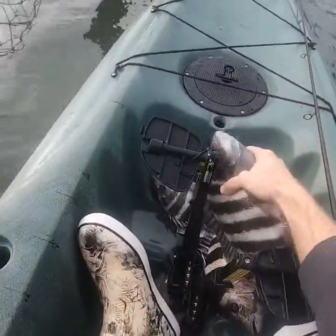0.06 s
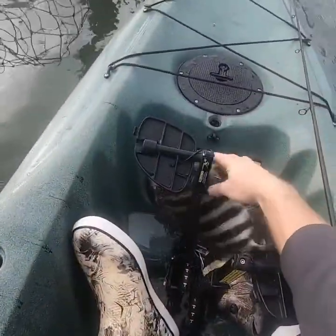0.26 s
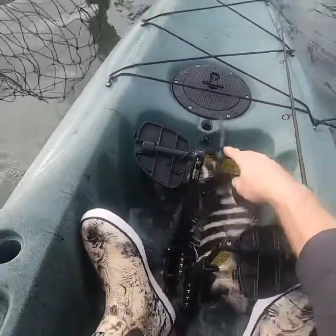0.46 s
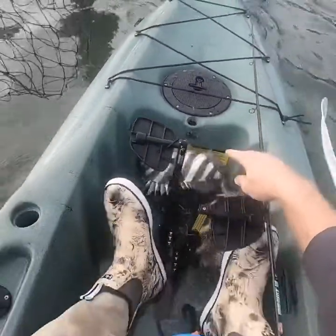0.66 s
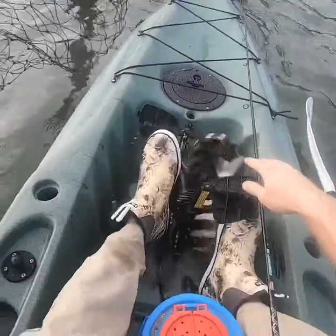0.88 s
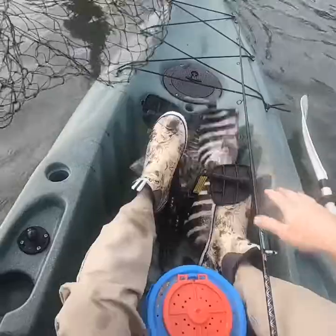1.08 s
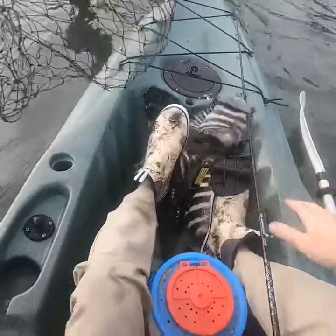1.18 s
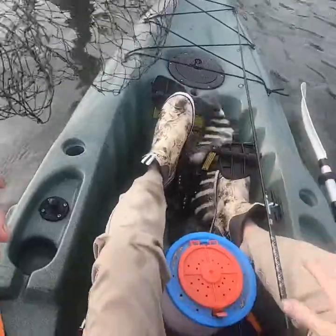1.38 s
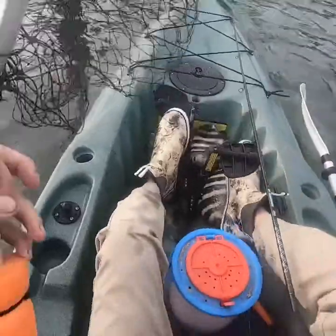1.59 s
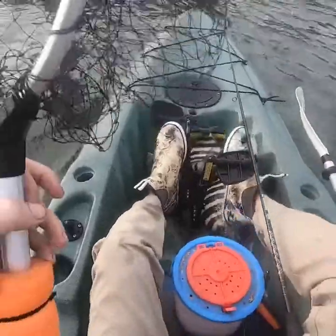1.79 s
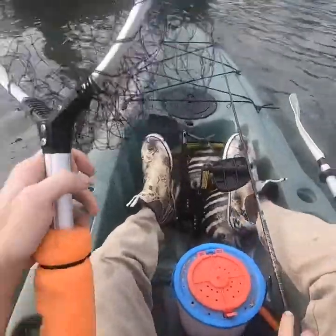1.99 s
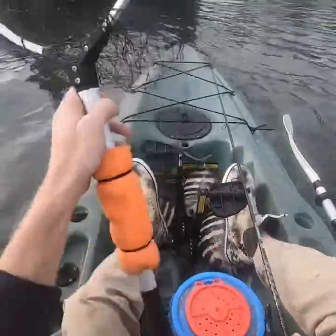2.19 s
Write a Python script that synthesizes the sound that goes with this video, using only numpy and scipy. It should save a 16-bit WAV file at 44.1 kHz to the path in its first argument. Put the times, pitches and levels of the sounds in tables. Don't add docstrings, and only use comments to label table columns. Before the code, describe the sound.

A wet fish struggles on a hollow plastic kayak deck. After a faint start, loud boxy thumps and wet slaps cluster from 0.25 to 0.6 seconds, with chain and net rattles, clicks and scraping. Scuffing continues to another burst of knocks around 0.9-1.0, then separate thuds near 1.37 and 1.57. Afterwards only faint taps remain under low wind rumble, close and almost mono.

```python
import sys
import numpy as np
from scipy import signal
from scipy.fft import rfft, irfft, next_fast_len
from scipy.io import wavfile
from scipy.ndimage import uniform_filter1d

SR = 44100
rng = np.random.default_rng(int(sys.argv[2]) if len(sys.argv) > 2 else 0)


def dump_mix(stems):
    frames = np.atleast_2d(stems).T
    limited = np.clip(frames, -1, 1)
    pcm = np.round(limited * 32767).astype(np.int16)
    wavfile.write(sys.argv[1], SR, pcm)


def magnitude_from_level(level_db):
    exponent = np.asarray(level_db, float) / 20
    return 10 ** exponent


N = 99225

# freq_hz, level_db_per_hz
SCRAPE_SPECTRUM = [(180, -2), (300, 2), (371, -6.5), (541, -9.5), (1370, -12), (3170, -18), (9800, -35.5),
                   (15000, -38)]


def unit(x):
    return x / np.sqrt(np.mean(x ** 2))


def colour(x, points):
    n, p = next_fast_len(2 * len(x)), np.array(points)
    log_hz = np.log(np.maximum(np.arange(n // 2 + 1) * SR / n, 1))
    gain_db = np.interp(log_hz, np.log(p[:, 0]), p[:, 1], left=-80)
    return irfft(rfft(x, n) * magnitude_from_level(gain_db), n)[:len(x)]


def band(x, hz, width_hz):
    q = max(hz / width_hz, 0.3)
    return signal.lfilter(*signal.iirpeak(min(hz, 0.4 * SR), q, fs=SR), x)


def walk(rate_hz):
    k = int(SR / rate_hz)
    steps = np.repeat(rng.standard_normal(N // k + 1), k)
    return 1.11 * uniform_filter1d(uniform_filter1d(steps, k), k)[:N]


def add(out, x, start_s):
    i = int(start_s * SR)
    out[i:i + len(x)] += x[:max(len(out) - i, 0)]


def curve(table):
    p = np.array(table)
    return np.interp(np.arange(N) / SR, p[:, 0], p[:, 1])


def swell(t, length_s):
    rise_s = 0.47 * length_s
    rise = np.sin(np.pi / 2 * np.minimum(t / rise_s, 1)) ** 2
    return rise * np.exp(-(np.maximum(t - rise_s, 0) / length_s) ** 2)


def hull(x):
    # freq_hz, level_db, t60_s
    modes = [(96.4, 1, 0.21), (140, 0.5, 0.32), (174.8, 6, 0.12), (228.7, 5, 0.12), (300, -15, 0.48),
             (385.3, -6.5, 0.25)]
    t = np.arange(SR // 3) / SR
    ring = np.zeros(len(t))
    for hz, db, t60_s in modes:
        ring += magnitude_from_level(db) * np.sin(2 * np.pi * hz * t) * np.exp(-np.log(1000) * t / t60_s)
    return signal.fftconvolve(x, ring)[:N] / 100


def thumps():
    # start_s, peak_db, contact_pitch_hz,
    # contact_cycles
    blows = [(0.051, -30, 168, 5.8), (0.211, -24.5, 196.6, 6.3), (0.278, 0.5, 254.3, 4.14),
             (0.295, -12.5, 192, 2.26), (0.307, -16, 207, 3.3), (0.348, -10, 227, 4.5),
             (0.413, -12, 154, 1.8), (0.427, -2.5, 359, 3.06), (.428, -10, 700, 3.33),
             (.432, -8, 142.6, 1.93), (0.524, -5.5, 172, 2.9), (.542, 0, 239, 2.66),
             (0.563, -10.5, 147, 2.86), (0.718, -20, 149, 4.5), (.783, -11, 300, 4.06),
             (0.832, -13.5, 170, 2.47), (0.8893, -1.5, 234.6, 3.27), (0.907, -9, 302, 3.12),
             (0.966, -1.5, 243, 1.96), (0.975, -15, 140, 4.55), (0.981, -15, 251, 3.23),
             (1.12, -23, 76.6, 1.16), (1.228, -21, 326, 5.8), (1.250, -18.5, 235, 7), (1.367, 0, 255, 2.5),
             (1.38, -13, 217, 2.75), (1.418, -16.5, 708, 3.5), (1.46, -11.5, 217, 2.06),
             (1.567, -5.5, 243.6, 1.95), (1.58, -21.5, 223, 2.73), (1.477, -31, 214, 4.9),
             (1.971, -20, 108, 1.66), (2.174, -26, 184, 3.95)]
    ring_db, overtone_db = -16.5, -10.5
    slap_db, slap_hz, slap_s = -25, 480, 0.0083
    flex, slap, t = np.zeros(N), np.zeros(N), np.arange(2000) / SR
    slap_env = t / slap_s * np.exp(-(t / slap_s) ** 2)
    for s, db, hz, cycles in blows:
        contact_s = cycles / hz
        u = np.arange(int(contact_s * SR)) / (contact_s * SR)
        press = np.sin(np.pi * u ** 0.98) ** 1.21
        bend = np.cos(2 * np.pi * cycles * (u - 0.47))
        overtone = magnitude_from_level(overtone_db) * (1 - u) ** 2 * np.sin(2 * np.pi * 1.88 * cycles * u)
        add(flex, magnitude_from_level(db) * press * (bend - overtone), s)
        add(slap, magnitude_from_level(db) * slap_env * rng.standard_normal(len(t)), s)
    slap = band(band(slap, slap_hz, 650), slap_hz, 620) * 10
    return flex + magnitude_from_level(ring_db) * hull(flex) + magnitude_from_level(slap_db) * slap


def rattles():
    # start_s, peak_db, brightness_db, length_ms
    bursts = [(0.0484, -28.5, -64, 3.6), (0.121, -41, -11, 5), (0.173, -30.5, -42, 8.7),
              (0.2217, -24, -20.5, 13), (0.2342, -8, -20.5, 5.5), (0.2506, -17.5, -14, 12),
              (0.2665, -19.5, -19, 19), (0.2894, -14, -14.5, 3.4), (0.3273, -14, -41, 4.2),
              (0.383, -29.5, -3.5, 5.2), (0.4074, -22, -7.5, 4.1), (0.426, -18, -37, 4),
              (0.4573, -13, -13, 12), (0.472, -21, -5, 8.5), (0.4943, -20.5, -5.5, 8.5),
              (0.5102, -23, -7.5, 9.5), (0.5427, -20.5, -8, 3.2), (0.5637, -23.5, -8, 3.8),
              (0.6055, -25, -7.5, 15), (0.6241, -18, -11.5, 15.3), (0.6427, -11, -23, 11.7),
              (0.666, -23, -12, 7.4), (0.751, -32, -18, 2.8), (0.7861, -13, -40, 6.2),
              (0.832, -30.5, -5, 17), (0.8636, -18, -11.5, 3.2), (0.8871, -16, -14, 5.1),
              (0.9354, -22.5, -20.5, 4.2), (0.9487, -23.5, -11, 3.7), (.980, -24.5, -29, 5.7),
            (1.032, -41, -6.5, 8.9), (1.114, -31, -21.5, 6), (1.0883, -27, -35, 12),
            (1.1546, -33.5, -8.5, 10), (1.1876, -26.5, -12, 4.5), (1.197, -28, -12.5, 3.4),
            (1.2073, -21.5, -17, 6.5), (1.236, -26.5, -16, 4), (1.249, -31, -7.5, 6),
            (1.2906, -30, -12, 1.5), (1.279, -35, -10, 3), (1.3056, -32, -29, 4.4),
            (1.3137, -24.5, -15.5, 9), (1.347, -28, -11.5, 3.4), (1.358, -24, -38, 9),
            (1.396, -32.5, -9, 4.5), (1.4112, -22.5, -25, 7.7), (1.4385, -29, -14.5, 4),
            (1.4745, -36, -38, 4.1), (1.5268, -30, -23, 9.9), (1.5603, -32.5, -14, 2.6),
            (1.5782, -31, -12.5, 6.1), (1.6054, -28.5, -28.5, 6.9), (1.7369, -34, -40, 5.4),
            (1.814, -36.5, -19, 4), (1.859, -50, -9.5, 1.6), (1.868, -43, -21, 4), (2.056, -32.5, -24, 2.3),
            (2, -18, -82, 4.8), (2.029, -31.5, -37, 8.3), (2.1704, -40, -32, 6.8), (2.205, -33, -20.5, 3.9),
            (2.2418, -45.5, -44, 1.9)]
    body_db, top_lift_db, grit_db, patchy_db, split_hz = -10.5, 2, -2.5, -2, 7100
    out, t = np.zeros(N), np.arange(3000) / SR
    centres_hz = 650 * 2 ** np.arange(0, 4.6, 0.6)
    for s, db, bright_db, ms in bursts:
        noise, wander = rng.standard_normal((2, len(t)))
        rough = magnitude_from_level(grit_db * 2.3 * uniform_filter1d(wander, size=25))
        grit = unit(colour(noise * rough, SCRAPE_SPECTRUM))
        for hz in centres_hz:
            strength, spread = rng.standard_normal(2)
            octaves = np.clip(np.log2(hz / split_hz) + 1, 0, 1.5)
            lift_db = (bright_db + 19.5 + top_lift_db) * octaves
            level_db = db + body_db + lift_db + patchy_db * np.tanh(strength)
            env = swell(t, (ms + 1) / 1000 * magnitude_from_level(1.2 * spread))
            burst = magnitude_from_level(level_db) * env * band(grit, hz, hz * 0.61)
            add(out, burst, s - 0.001 + 0.0004 * abs(spread))
    return out


def pings():
    # start_s, peak_db, ring_hz, length_ms
    clicks = [(0.085, -36.5, 543, 4), (0.194, -35.5, 674, 8), (.236, -25, 1630, 3.1),
              (0.237, -24.5, 980, 4.7), (0.266, -26.5, 3900, 6.2), (0.289, -19, 3070, 4.4),
              (0.332, -20.5, 1036, 14), (.354, -20.5, 920, 5.7), (0.408, -32, 4060, 5.2),
              (0.473, -21.5, 3100, 4.3), (0.475, -26.5, 1734, 6.4), (.543, -12, 543, 5.6),
              (0.565, -29.5, 3880, 5), (.607, -29, 3480, 5), (.625, -28, 1680, 6.4),
              (.645, -16.5, 798, 6.6), (0.647, -26, 3130, 4.4), (.664, -31, 2370, 9),
              (0.71, -24.5, 1150, 7.4), (0.725, -36.5, 3100, 7.7), (0.811, -26.5, 1660, 7.3),
              (.845, -35, 3800, 3.8), (.886, -34, 4370, 7.5), (0.936, -29.5, 3100, 3),
              (.937, -30.5, 2020, 2.9), (.957, -34.5, 3110, 4), (1.032, -40, 2030, 8.2),
              (1.033, -41, 3020, 4.4), (1.061, -39.5, 2980, 4.2), (1.087, -32, 866, 9.5),
              (1.089, -32, 1650, 4.2), (1.128, -41.5, 3760, 6), (1.156, -31.5, 2960, 7.4),
              (1.186, -34.5, 3000, 12), (1.21, -28.5, 1680, 3.7), (1.265, -31, 3260, 4.8),
              (1.313, -39, 3740, 5.3), (1.344, -31, 1193, 20), (1.364, -33, 3540, 7.2),
              (1.380, -39, 2090, 4.9), (1.432, -24, 520, 4.5), (1.576, -29.5, 1020, 2.8),
              (1.608, -51, 2130, 3.5), (1.813, -41, 3160, 3.4), (2.087, -48, 1870, 5.6),
              (2.172, -36.5, 1590, 4.7), (2.237, -39.5, 1636, 11.5)]
    out, t = np.zeros(N), np.arange(2000) / SR
    for s, db, hz, ms in clicks:
        wobble = np.convolve(rng.standard_normal(len(t)), np.hanning(60), "same")
        rough = 1 + 0.8 * unit(wobble)
        env = swell(t, 1.46 * ms / 1000 / 2)
        add(out, magnitude_from_level(db) * env * rough * np.sin(2 * np.pi * hz * t), s - 0.001)
    return out


def crackle():
    rate_per_s, snap_s, spread_db = 110, 0.0054, 2.5
    hits = rng.random(N) < rate_per_s / SR
    sizes = magnitude_from_level(spread_db * np.minimum(rng.exponential(size=N), 2))
    return signal.fftconvolve(hits * sizes, np.hanning(int(snap_s * SR)), "same")


def scuffing():
    # time_s, scuffing_level_db
    struggle = [(0, -48.5), (.21, -48.5), (.24, -37), (.47, -30.5), (.7, -33), (.96, -29.5), (.99, -43),
                (1.14, -47), (1.2, -37.5), (1.45, -41.5), (1.5, -45.5), (1.64, -51), (2.08, -52),
                (2.25, -44.5)]
    flicker_db, dulling = 2.5, 0.044
    effort_db = curve(struggle)
    lively = np.clip((effort_db + 58) / 20, 0.15, 1)
    hiss = colour(rng.standard_normal(N), SCRAPE_SPECTRUM)
    shared = crackle()
    scrape = np.zeros(N)
    for hz in 400 * 2 ** np.arange(0, 5.3, 0.5):
        grains = hiss * (1 + 0.8 * lively * (0.5 * shared + 0.56 * crackle()))
        grains = band(band(grains, hz, hz * 0.78), hz, hz * 0.78)
        off_centre = abs(np.log2(hz / 2000)) + 3 * max(np.log2(hz / 8000), 0)
        flicker = flicker_db * walk(90.15) * lively
        scrape += grains * magnitude_from_level(flicker + dulling * (effort_db + 33.5) * off_centre)
    scrape /= np.sqrt(np.median(uniform_filter1d(scrape ** 2, size=4000)))
    rumble = unit(hull(rng.standard_normal(N) * magnitude_from_level(5.0 * walk(35.53))))
    rumble_db = 6.0 + 0.063 * (effort_db + 30.5)
    return magnitude_from_level(effort_db) * (scrape + magnitude_from_level(rumble_db) * rumble)


def breeze():
    # freq_hz, level_db_per_hz
    air_spectrum = [(15, -40), (25, 2.5), (208, -10), (366, -3), (480, -11), (3280, -41.5), (9000, -88),
                    (11700, -104), (19800, -120)]
    # time_s, level_db
    gust_level = [(0, -51), (.25, -26.5), (.45, -30.5), (.75, -24), (1.05, -35.5), (1.35, -35.5),
                  (1.75, -34.5), (2.25, -35.5)]
    # time_s, level_db
    apart_level = [(0, -65.5), (1.6, -64.5), (1.75, -57), (1.95, -43.5), (2.1, -48), (2.25, -41)]
    air_db = -42.5

    def moving_air():
        return unit(colour(rng.standard_normal(N), air_spectrum)) * magnitude_from_level(air_db + 2.0 * walk(8.4))

    air, apart = moving_air(), moving_air()
    gust = unit(band(band(rng.standard_normal(N), 67, 100), 59, 84))
    gust = gust * magnitude_from_level(curve(gust_level) + 0.72 * walk(12))
    return air + gust, magnitude_from_level(curve(apart_level) - air_db) * band(apart, 140, 500)


def scene():
    # freq_hz, side_db
    side_level = [(20, -39), (150, -68), (2500, -35.5), (11200, -24.5), (11900, -3.5), (20000, -2)]
    # freq_hz, gain_db
    response = [(20, -2), (4400, -0.5), (4900, -6), (10100, -10.5), (10600, -16), (20000, -20)]
    wind, apart = breeze()
    mid = colour(thumps() + rattles() + pings() + scuffing() + wind, response)
    side = colour(np.roll(mid, 260), side_level) + apart
    return np.array([mid + side, mid - side])


def roll_off(x):
    return signal.sosfilt(signal.butter(12, 15720, fs=SR, output="sos"), x)


def record(dry):
    rounded = np.tanh(0.58 * dry) / 0.55
    top_cut = signal.ellip(8, 0.2, 70, 15450, fs=SR, output="sos")
    return roll_off(signal.sosfilt(top_cut, rounded))


dry = scene()
out = record(dry)
dump_mix(out)
```